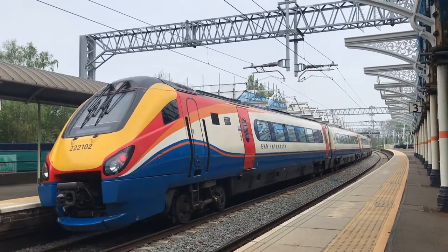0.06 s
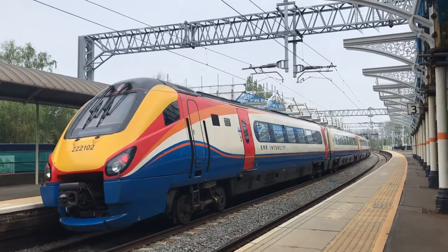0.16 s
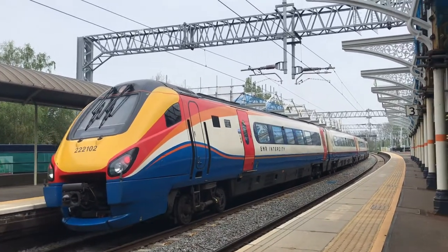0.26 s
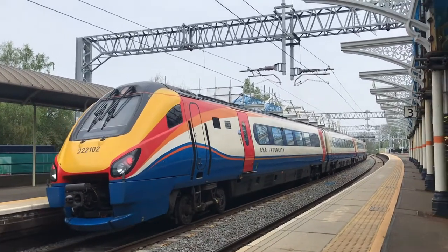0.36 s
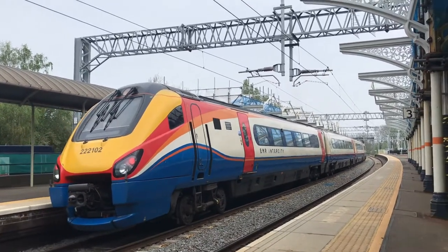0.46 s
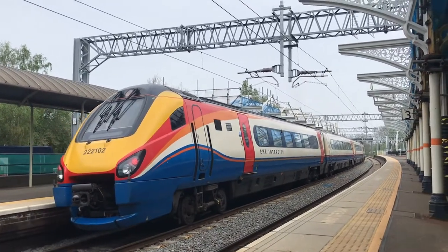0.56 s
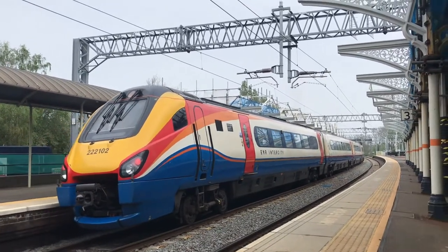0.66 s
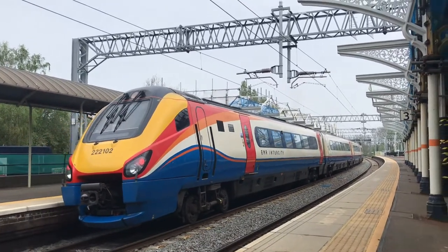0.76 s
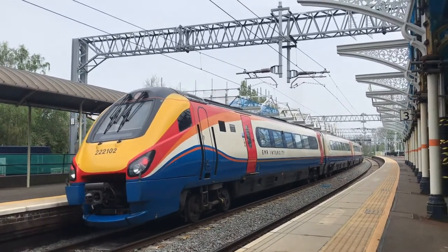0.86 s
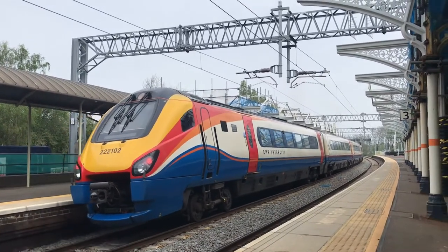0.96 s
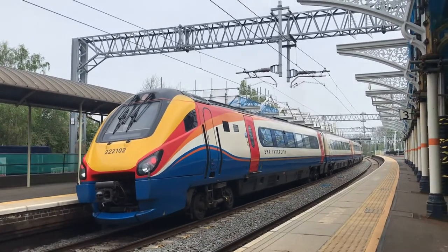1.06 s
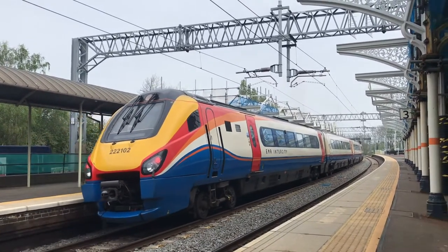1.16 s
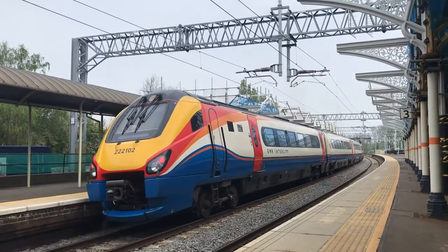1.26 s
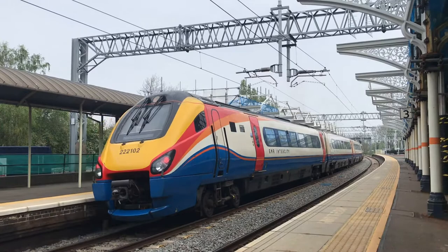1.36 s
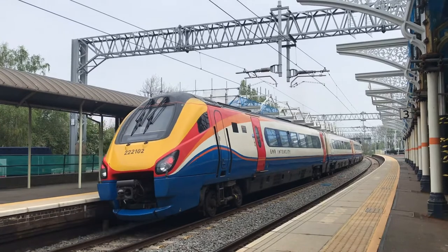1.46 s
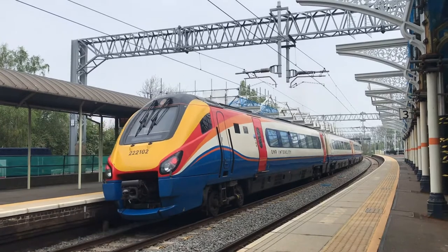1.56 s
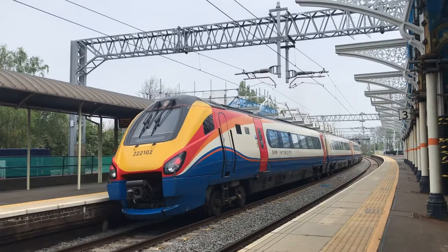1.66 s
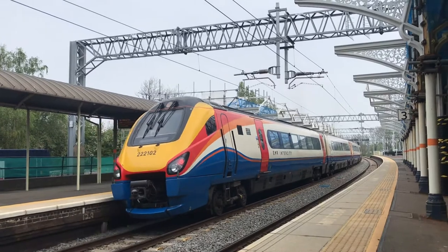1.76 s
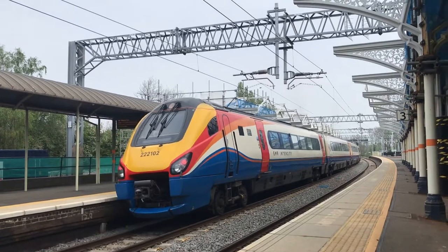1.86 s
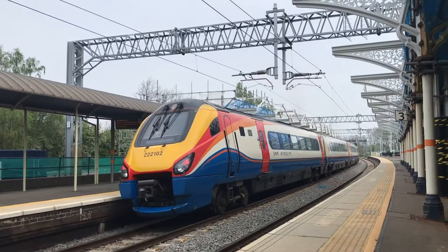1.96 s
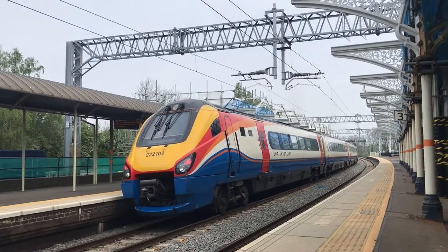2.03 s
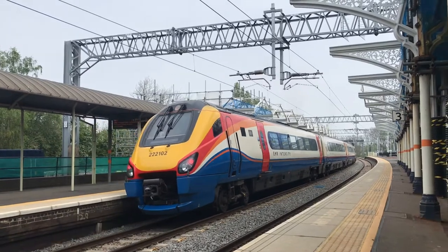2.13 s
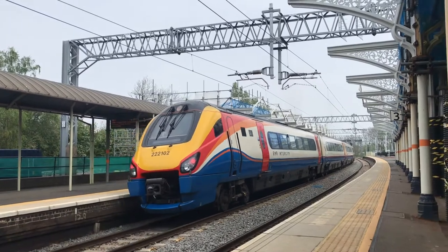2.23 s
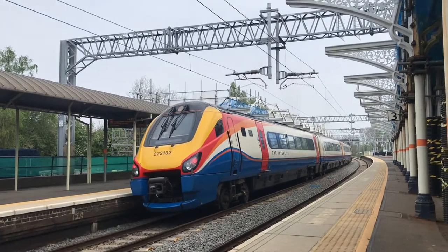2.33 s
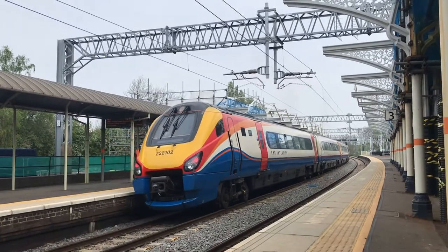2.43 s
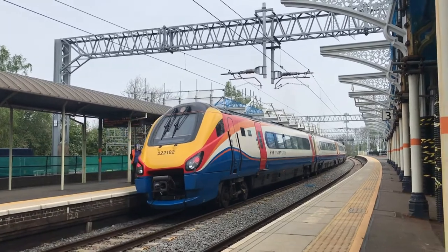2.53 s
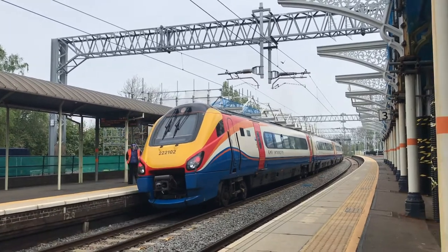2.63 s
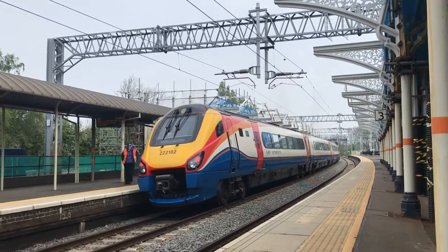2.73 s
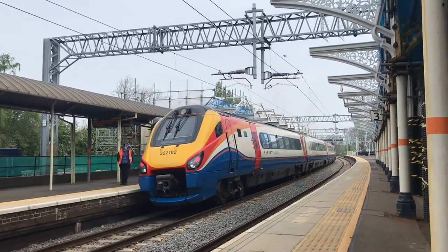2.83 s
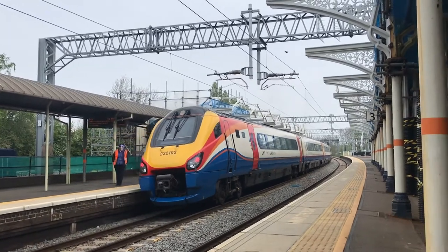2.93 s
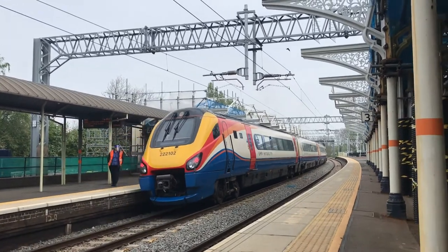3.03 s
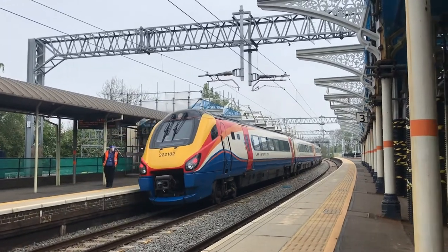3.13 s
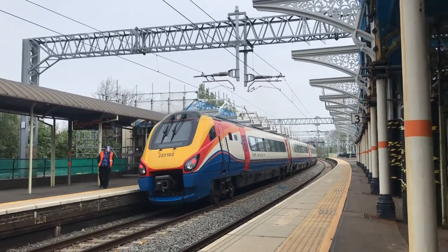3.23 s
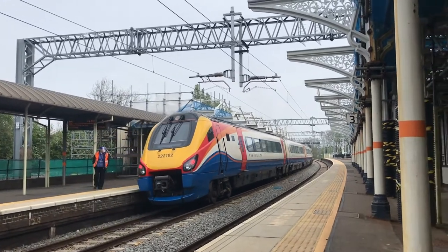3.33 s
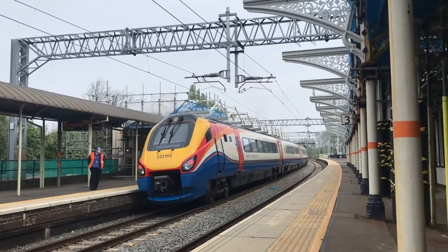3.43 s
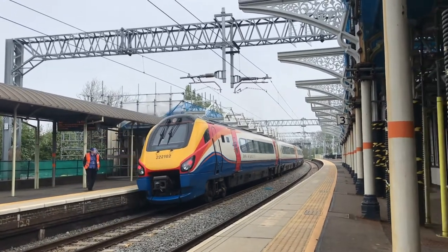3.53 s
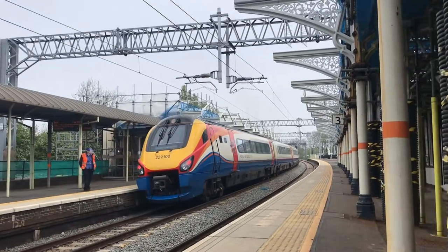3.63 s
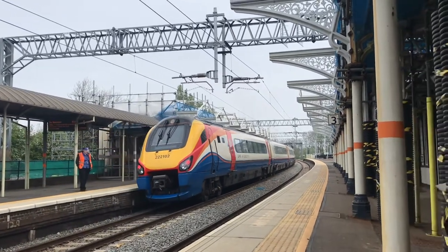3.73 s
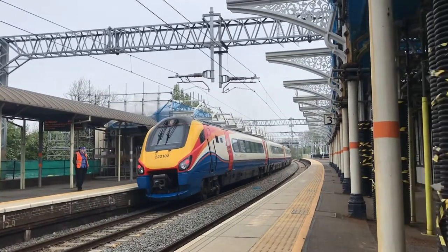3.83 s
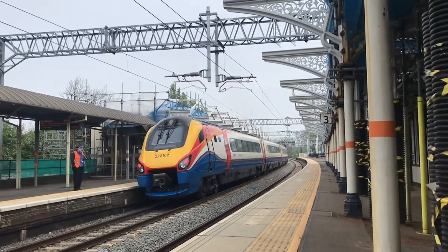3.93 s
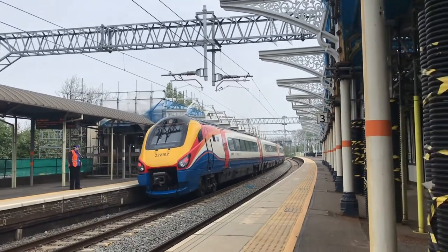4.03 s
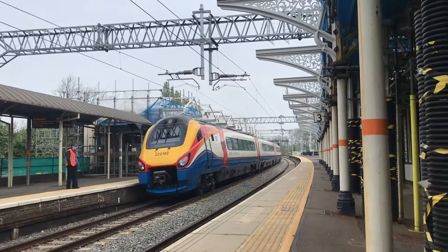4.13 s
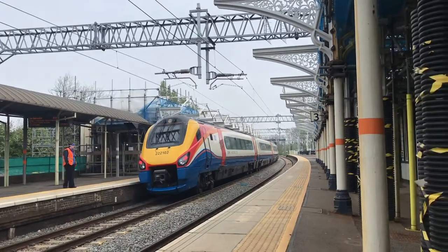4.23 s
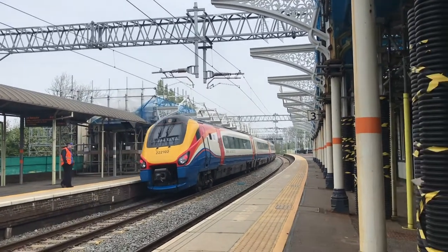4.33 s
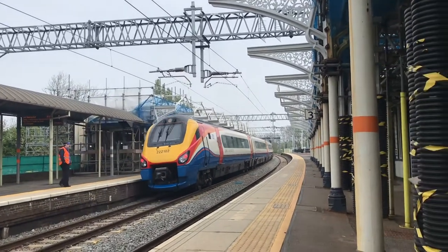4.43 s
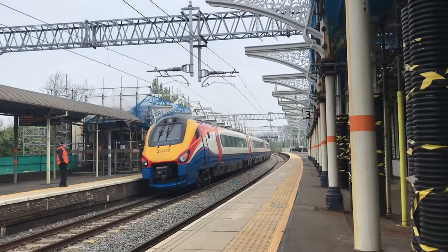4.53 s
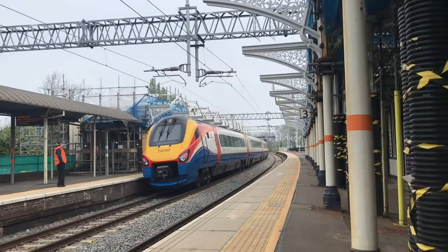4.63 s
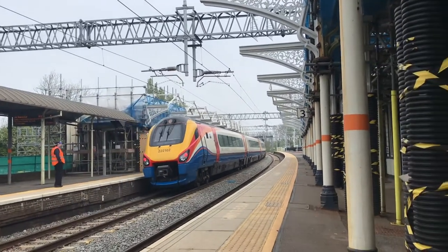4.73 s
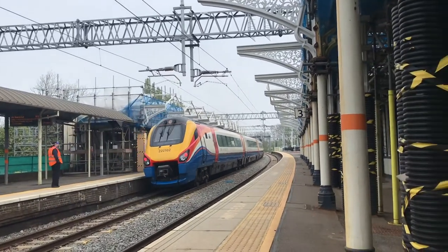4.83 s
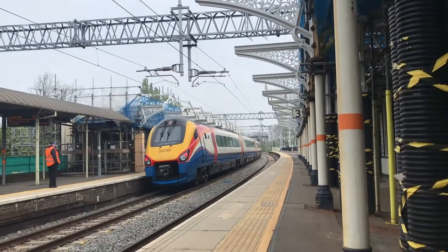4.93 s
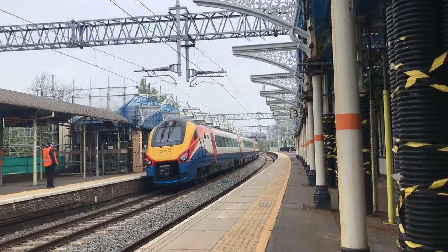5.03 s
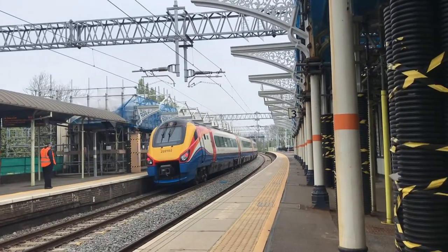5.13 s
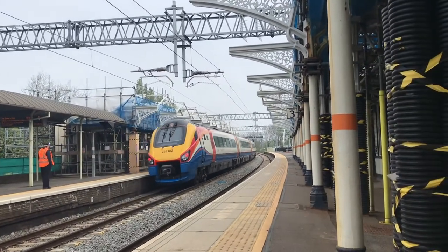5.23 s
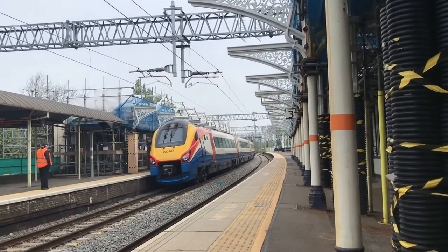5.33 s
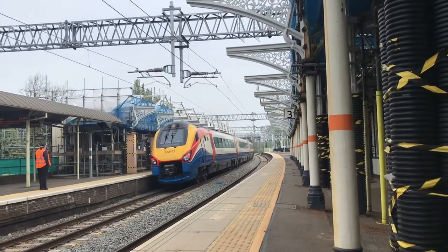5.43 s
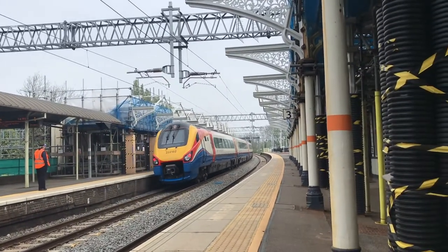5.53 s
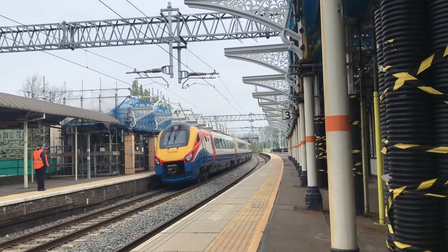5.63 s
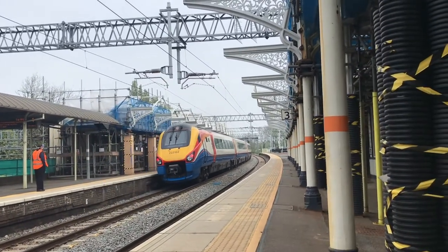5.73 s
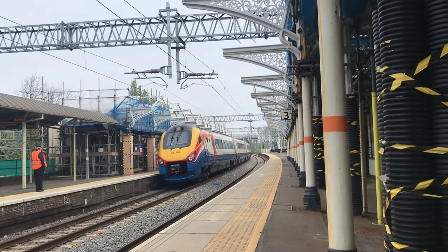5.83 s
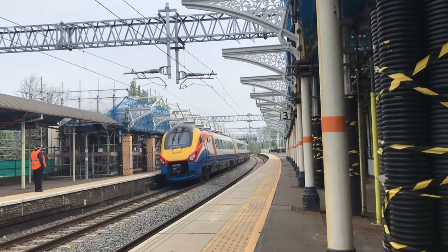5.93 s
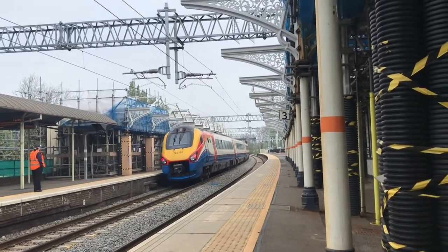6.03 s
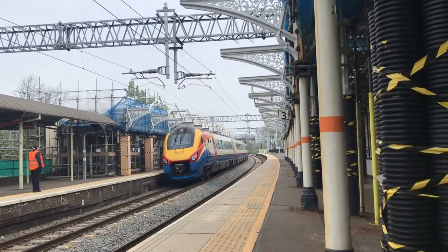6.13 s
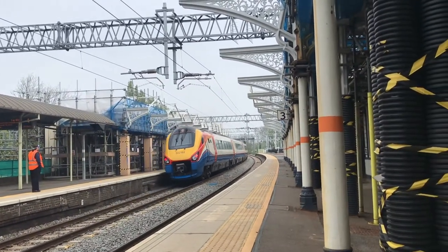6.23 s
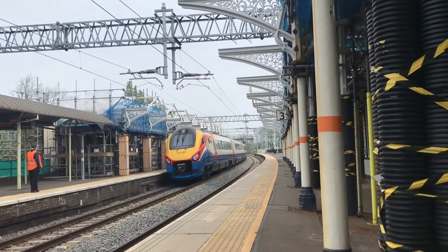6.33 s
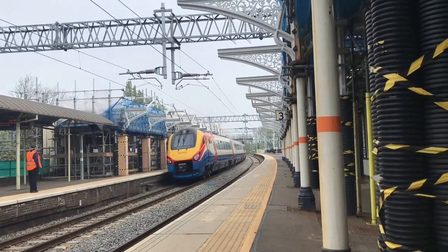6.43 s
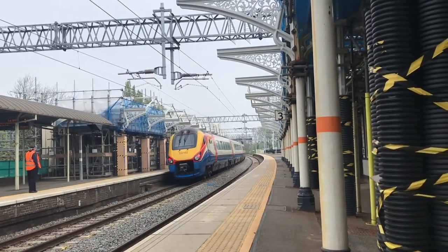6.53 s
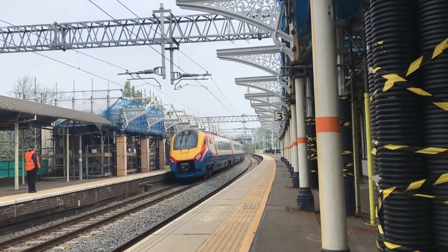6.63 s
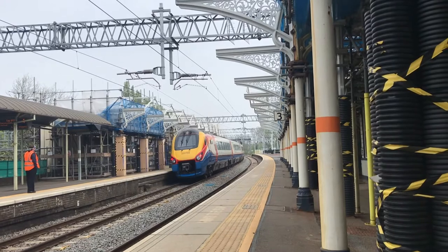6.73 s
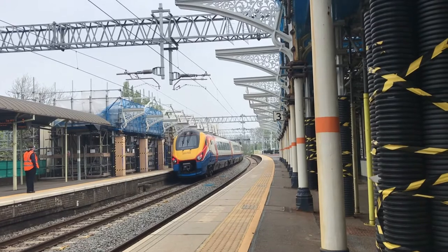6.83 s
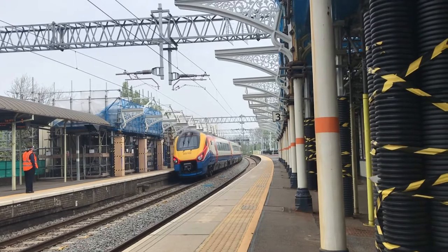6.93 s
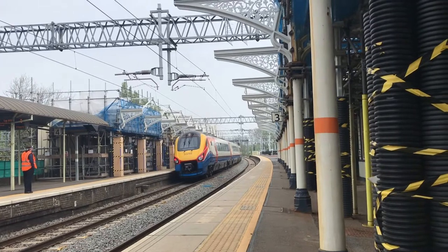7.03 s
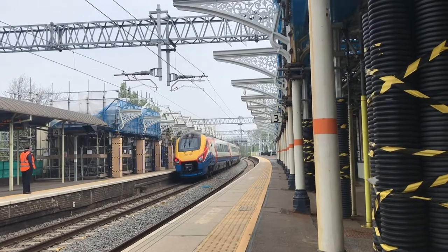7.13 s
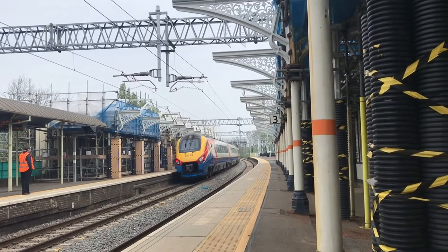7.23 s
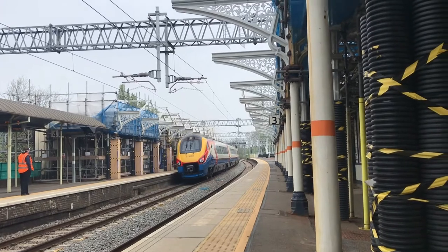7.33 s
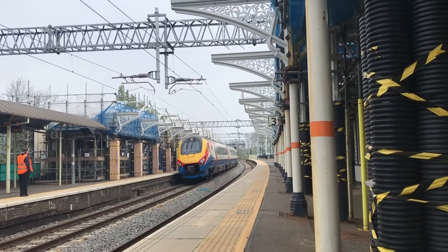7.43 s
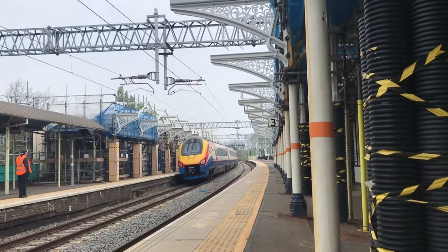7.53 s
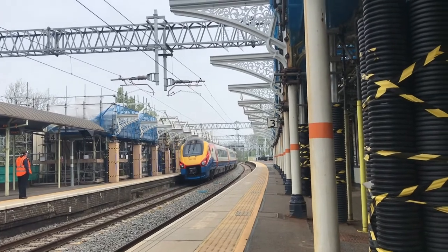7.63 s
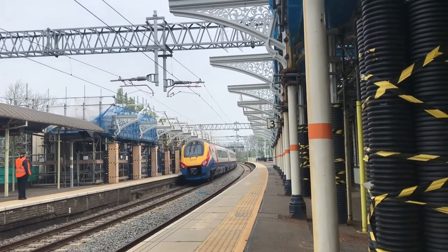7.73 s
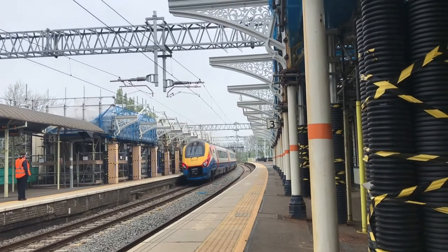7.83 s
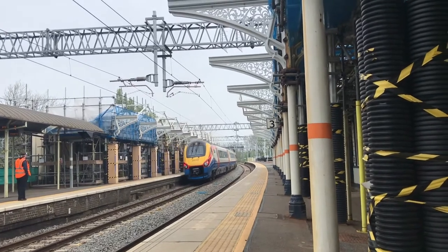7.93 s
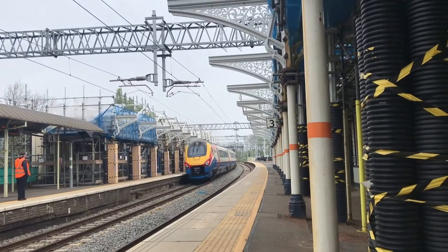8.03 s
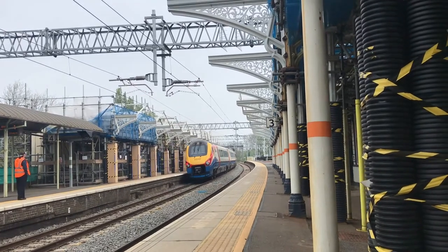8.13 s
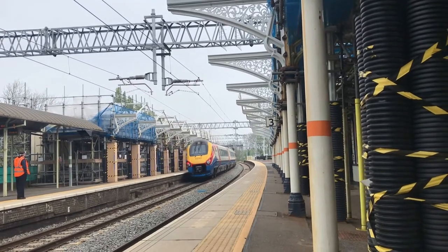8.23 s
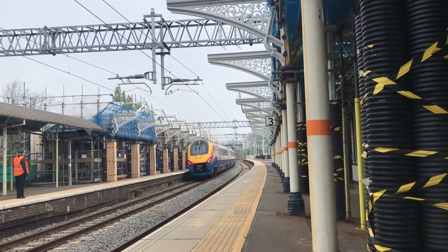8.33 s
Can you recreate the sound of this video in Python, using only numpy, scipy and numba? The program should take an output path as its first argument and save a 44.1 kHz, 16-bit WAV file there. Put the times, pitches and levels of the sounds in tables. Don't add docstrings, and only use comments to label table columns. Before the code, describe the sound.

A departing diesel train heard in mono from the platform: a deep pulsing engine hum over broad fan and combustion roar. Another engine catches up low underneath as brake discs sing faintly and compressed air vents around one second. A small skip and thump follows. The engine note keeps climbing while its exhaust thins and recedes, leaving generator hum, rumble, and a soft, rising airy turbo whistle.

```python
import sys
import numpy as np
from scipy import signal
from scipy.fft import rfft, irfft, next_fast_len
from scipy.io import wavfile
from scipy.ndimage import uniform_filter1d
from numba import njit

SR = 44100
rng = np.random.default_rng(int(sys.argv[2]) if len(sys.argv) > 2 else 0)


def decibels_to_gain(level_db):
    exponent = np.asarray(level_db, float) / 20
    return 10 ** exponent


def master(y):
    cut = np.clip(np.atleast_2d(y).T, -1, 1)
    pcm = np.round(cut * 32767)
    wavfile.write(sys.argv[1], SR, pcm.astype(np.int16))


N = 369999
T = np.arange(N) / SR

# start_s, rear_hz, next_hz
FIRING_RATES = [(0.0, 64.11, 64.05), (0.5, 66.87, 67.33), (0.9, 68.84, 69.87), (1.3, 68.95, 71.35),
                (1.8, 71.01, 72.55), (2.3, 72.9, 73.75), (2.8, 74.63, 76.32), (3.3, 76.48, 79.48),
                (3.8, 78.25, 80.91), (4.3, 80.58, 82.74), (4.8, 82.01, 83.57), (5.3, 83.39, 85.56),
                (5.8, 84.28, 87.43), (6.3, 85.29, 88.82), (6.8, 86.6, 89.52), (7.3, 88.34, 90.06),
                (7.8, 89.59, 90.19), (8.39, 90.65, 90.0)]
# start_s, rear_note_db, rear_octave_db, next_note_db, next_octave_db
EXHAUST_LEVELS = [(0, -28.5, -32, -35.8, -22), (.7, -24.5, -26.5, -32, -31), (1.3, -22.3, -20, -38, -30),
                  (2, -29, -20.7, -36.5, -25.7), (2.7, -26.2, -20.6, -36.5, -34),
                  (3.5, -31.5, -23, -37, -42), (4.3, -34.5, -27.5, -36.5, -39),
                  (5, -35.5, -29.2, -36, -36.5), (5.7, -31.8, -33, -37.5, -40),
                  (6.4, -32.5, -34.8, -50, -41.5), (7.1, -37.5, -43, -55, -40.5),
                  (7.7, -38.5, -47, -58, -39.5), (8.39, -50, -48, -50, -32)]
# start_s, rear_db, next_db
FIFTH_ORDER = [(0, -50, -60), (2.07, -51, -60), (2.5, -47, -55), (5, -39, -51), (6, -37.5, -43),
               (6.78, -43.5, -49), (7.16, -51, -37), (7.63, -49, -46), (8.38, -40, -41)]
# order_turns, start_level_db, change_db_per_s
WEAK_ORDERS = [(1.51, -53, -0.6), (2.51, -58, -1.5), (3.6, -53, 0.26), (4.456, -57, 0.95),
               (5.59, -51.5, 0.35), (6.56, -36, -3.5), (7.07, -53, -1), (7.29, -55, -1), (8.005, -42, -2.5),
               (9.12, -41, -2), (10.11, -50.5, -1.46), (10.92, -55, -1.65), (12.044, -54.5, -0.83),
               (13.9, -68, 1.44), (19.97, -69.5, 1.43), (29.93, -64, .8)]
CRANK_TURNS = [(.107, .205), (.22, .92)]
# start_s, hum_db, octave_db
HUM_LEVELS = [(0, -49, -45), (1.5, -43, -47), (2.5, -36, -53), (3.3, -41, -39), (5.6, -42, -40.5),
              (6.4, -32, -39.5), (7.4, -38.5, -39), (7.9, -37.5, -46.5), (8.39, -35, -53)]
# freq_hz, density_db_per_hz
ROAR_COLOUR = [(22, -32), (40, -2.5), (64, -6), (110, -9), (220, -8.5), (290, -12.5), (330, -16),
               (470, -21.5), (850, -20.5), (1400, -25), (2000, -28), (3100, -27.5), (6000, -36),
               (15600, -47.5)]
# centre_hz, width_hz, level_db
CASING_MODES = [(1622, 290, -54), (853, 200, -68), (3140, 680, -62), (3730, 150, -78), (5350, 440, -65)]
# start_s, pitch_hz, level_db
FAN_WHINE = [(0, 1670, -56), (2.2, 1655, -57), (3.3, 1710, -57), (5, 1715, -57), (6, 1720, -56),
             (7, 1720, -56), (8.39, 1728, -55)]
# centre_hz, width_hz, level_db, swell_share
DISC_MODES = [
    (13730, 260, 0, .85),
    (9770, 190, -2, 1),
    (7720, 170, -1.5, 1),
    (11480, 330, -10, 1.2),
]
# start_s, hold_s, level_db
SING_SPELLS = [
    (.19, .02, -72),
    (.58, .17, -68),
    (.85, 0.3, -54),
    (1.25, 0.22, -52.5),
    (1.71, .2, -61),
    (2.16, 0.19, -63),
    (2.6, .12, -76),
]
# start_s, firing_hz, level_db
LATE_ENGINE = [(.66, 48.5, -50), (.78, 50.5, -31), (.88, 52.5, -25), (1.05, 56, -25), (1.2, 59.5, -28),
               (1.35, 63, -32), (1.5, 65, -42), (1.7, 68, -50)]
# start_s, hold_s, level_db
VENT_PUFFS = [
    (.88, .04, -49),
    (.985, 0.11, -37.5),
    (1.2, 0.04, -38),
]
# freq_hz, density_db_per_hz
VENT_JET = [(200, -22), (400, -6), (700, -7), (1200, -3.5), (2000, -7.5), (3200, -2.5), (4600, -11.5),
            (6000, -9), (9800, -18), (15600, -22)]
# pitch_hz, flutter_hz, level_db
VALVE_TONES = [
    (1195, 4, -47.5),
    (2380, 160, -56),
]
# start_s, hold_s, level_db
VALVE_OPENINGS = [(1.0, .22, 0)]
# start_s, pitch_hz, level_db
NEAR_TURBO = [(2.5, 4300, -76), (4, 5300, -67), (5, 5800, -66), (6, 6300, -65), (7, 6700, -63),
              (7.7, 7050, -60), (8.39, 7200, -59)]
# start_s, pitch_hz, level_db
FAR_TURBO = [(7.2, 5100, -78), (7.7, 5400, -63), (8.39, 6000, -61)]
# freq_hz, gain_db
PORT_RESPONSE = [(4000, 0), (4900, -1.5), (5600, 0), (9800, 0.5), (10400, -5.5), (11500, -2), (14000, -1),
                 (15600, -7)]
# start_s, step_height, build_up_ms
SKIP_STEP = (1.45417, 0.16, 1.8)

SKIP_S, STEP_HEIGHT, BUILD_UP_MS = SKIP_STEP
LOST_S = .03699
TICK_S = 1 / SR + LOST_S * (np.arange(N) == int(SKIP_S * SR))


def curve(table):
    start_s, *columns = np.transpose(table)
    return [np.interp(T, start_s, column) for column in columns]


def spells(table, rise_db_per_s, fall_db_per_s):
    levels_db = []
    for start_s, hold_s, level_db in table:
        rise_db = rise_db_per_s * np.clip(start_s - T, 0, None)
        fall_db = fall_db_per_s * np.clip(T - start_s - hold_s, 0, None)
        levels_db.append(level_db - rise_db - fall_db)
    return np.max(levels_db, axis=0)


def tone(hz, db, turns=0):
    phase_turns = np.cumsum(hz * TICK_S) + turns
    return np.sqrt(2) * decibels_to_gain(db) * np.cos(2 * np.pi * phase_turns)


@njit
def svf(x, g, k):
    y, b, l = np.empty(len(x)), 0., 0.
    for i in range(len(x)):
        v = (b + g[i] * (x[i] - l)) / (1 + g[i] * (g[i] + k[i]))
        b, l, y[i] = 2 * v - b, l + 2 * g[i] * v, k[i] * v
    return y


def ring(hz, width_hz):
    hz = hz * np.ones(N)
    g = np.tan(np.pi * hz / SR)
    k = width_hz * np.pi / SR * (1 + g * g) / g
    y = svf(svf(rng.standard_normal(N), g, k), g, k)
    return y / y.std()


def walk(rate_hz):
    hold = int(SR / rate_hz)
    steps = np.repeat(rng.standard_normal(N // hold + 1), hold)
    slewed = uniform_filter1d(uniform_filter1d(steps, hold), hold)
    return 0.98 * slewed[:N]


def bands(colour, count):
    size = next_fast_len(N)
    log_hz = np.log(np.arange(size // 2 + 1) * SR / size + 1)
    freq_hz, density_db = np.transpose(colour)
    noise = rfft(rng.standard_normal(size)) * decibels_to_gain(np.interp(log_hz, np.log(freq_hz), density_db))
    noise = noise / irfft(noise, size).std()
    centres = np.linspace(np.log(40), np.log(16000), count)
    split = []
    for centre, share in zip(centres, np.eye(count)):
        band = irfft(noise * np.interp(log_hz, centres, share), size)[:N]
        split.append((np.exp(centre), band))
    return split


def engines():
    octave_lag_hz, wander_db = .068, 1.5
    firing_hz = curve(FIRING_RATES)
    levels_db = curve(EXHAUST_LEVELS)
    shaft_hz = firing_hz[0] / 3
    out = 0
    for hz, db in zip(firing_hz, curve(FIFTH_ORDER)):
        out = out + tone(5 / 3 * hz, db)
    for hz, note_db, octave_db, (note, octave) in zip(firing_hz, levels_db[::2], levels_db[1::2], CRANK_TURNS):
        out = out + tone(hz, note_db, note)
        out = out + tone(2 * hz, octave_db, octave - octave_lag_hz * T)
    for order, db, change in WEAK_ORDERS:
        spread_hz = .04 * order ** 2 + 1.5
        level_db = db + change * T + wander_db * walk(0.757)
        out = out + decibels_to_gain(level_db) * ring(order * shaft_hz, spread_hz)
    return out


def generator():
    hum_hz, twin_hz, twin_width_hz, twin_db = 49.9, 47.6, 2.2, -45.5
    hum_db, octave_db = curve(HUM_LEVELS)
    hum = tone(hum_hz, hum_db) + tone(2 * hum_hz, octave_db)
    return hum + decibels_to_gain(twin_db) * ring(twin_hz, twin_width_hz)


def roar():
    roar_db, leaving_db, leaving_s, gust_db, boost_db_per_s = -37, 2.9, 2.5, 1.3, 0.11
    middle_db = leaving_db * np.exp(-T / leaving_s) - .5
    bass_db = middle_db + gust_db * walk(2.495)
    treble_db = boost_db_per_s * (T - 4)
    out = 0
    for hz, band in bands(ROAR_COLOUR, count=16):
        to_middle = np.clip(np.log2(hz / 200) / 0.21, 0, 1)
        to_treble = np.clip(np.log2(hz / 1500) / 2, 0, 1)
        swell_db = bass_db + to_middle * (middle_db - bass_db) + to_treble * (treble_db - middle_db)
        out = out + decibels_to_gain(roar_db + swell_db + .8 * walk(7)) * band
    for hz, width_hz, db in CASING_MODES:
        level_db = db + middle_db + 2.0 * walk(7)
        out = out + decibels_to_gain(level_db) * ring(hz * (1 + 0.011 * walk(1)), width_hz)
    return out


def whistle(table, width_hz):
    hz, db = curve(table)
    return decibels_to_gain(db + 2.0 * walk(12)) * ring(hz, width_hz)


def fan():
    return whistle(FAN_WHINE, 38)


def brake_discs():
    top_db, patchy_db = -53, 2.6
    sing_db = spells(SING_SPELLS, rise_db_per_s=170, fall_db_per_s=50)
    sag = 1 - 0.033 * np.clip(T - 1.15, -.25, .25) + 0.024 * np.clip(T - 1.45, 0, .4)
    out = 0
    for hz, width_hz, db, share in DISC_MODES:
        level_db = db + top_db + share * (sing_db - top_db) + patchy_db * walk(16)
        out = out + decibels_to_gain(level_db) * ring(hz * sag, width_hz)
    return out


def late_engine():
    hz, db = curve(LATE_ENGINE)
    return tone(hz, db) * (T > LATE_ENGINE[0][0]) * (T < LATE_ENGINE[-1][0])


def air_vent():
    vent_db = spells(VENT_PUFFS, rise_db_per_s=150, fall_db_per_s=39)
    open_db = spells(VALVE_OPENINGS, rise_db_per_s=380, fall_db_per_s=380)
    out = 0
    for _, band in bands(VENT_JET, count=6):
        out = out + decibels_to_gain(vent_db + 1.0 * walk(60.4)) * band
    for hz, flutter_hz, db in VALVE_TONES:
        out = out + tone(hz + flutter_hz * walk(40), db + open_db + 1.5 * walk(20))
    return out


def turbos():
    return whistle(NEAR_TURBO, 520) + whistle(FAR_TURBO, 800)


def scene():
    train = engines() + generator() + roar() + fan()
    release = brake_discs() + late_engine() + air_vent()
    return (train + release + turbos())[None, :]


def roll_off(x):
    return signal.sosfilt(signal.butter(12, 15710, fs=SR, output="sos"), x)


def record(dry):
    size = next_fast_len(N)
    freq_hz, gain_db = np.transpose(PORT_RESPONSE)
    port_gain = decibels_to_gain(np.interp(np.arange(size // 2 + 1) * SR / size, freq_hz, gain_db))
    heard = irfft(rfft(dry, size) * port_gain, size)[:, :N]
    build_up = np.exp(-np.clip(SKIP_S - T, 0, 1) * 1000 / BUILD_UP_MS)
    step = STEP_HEIGHT * (T < SKIP_S) * build_up
    return roll_off(heard + step)


dry = scene()
out = record(dry)
master(out)
```